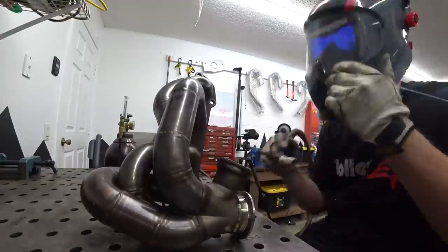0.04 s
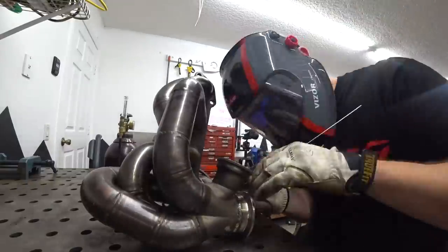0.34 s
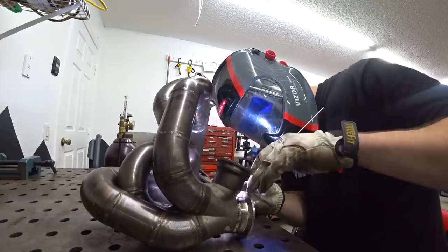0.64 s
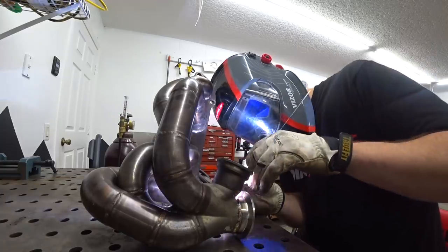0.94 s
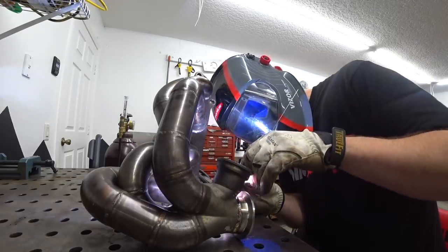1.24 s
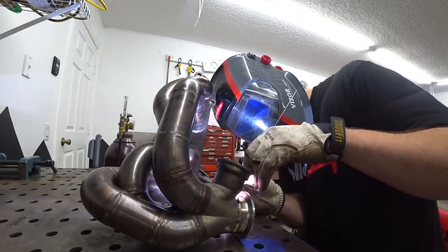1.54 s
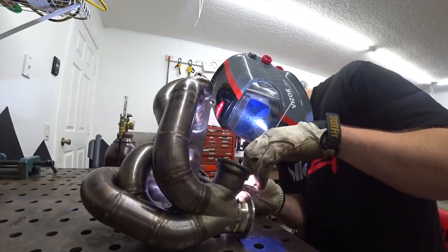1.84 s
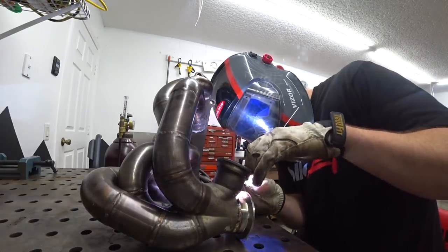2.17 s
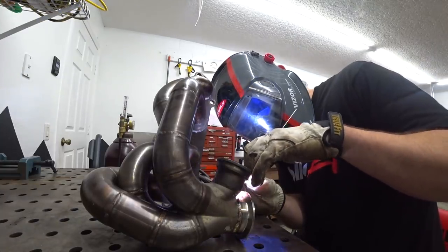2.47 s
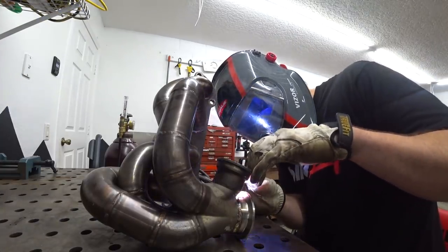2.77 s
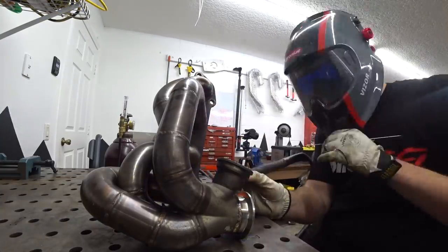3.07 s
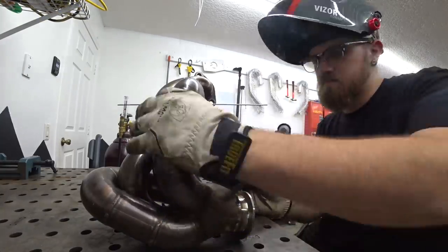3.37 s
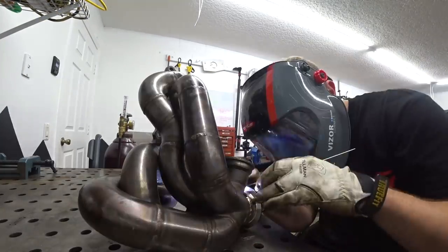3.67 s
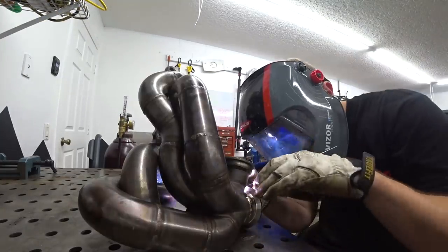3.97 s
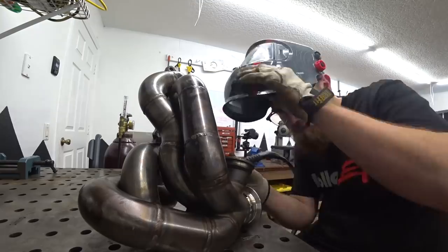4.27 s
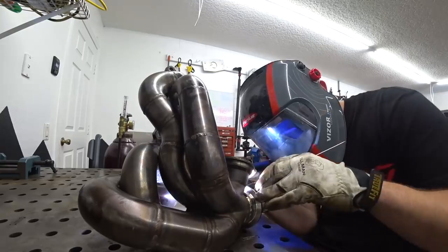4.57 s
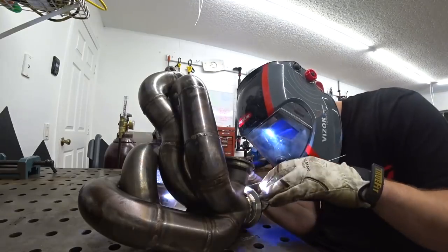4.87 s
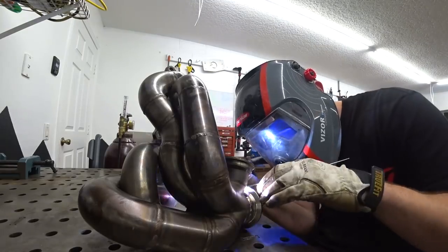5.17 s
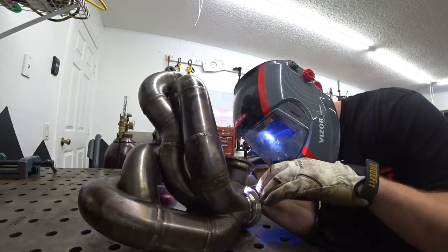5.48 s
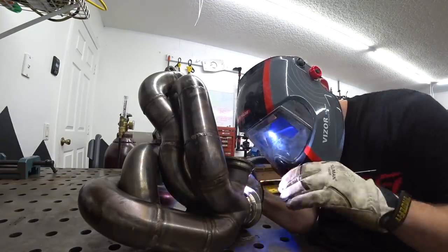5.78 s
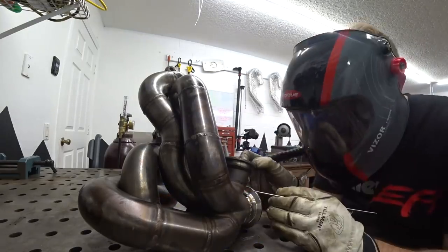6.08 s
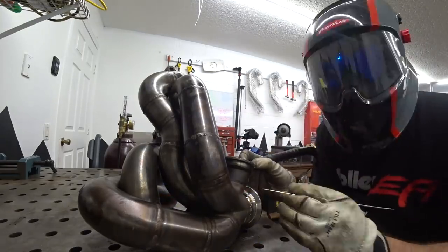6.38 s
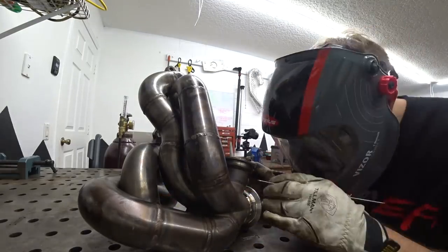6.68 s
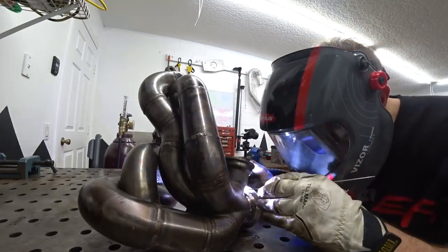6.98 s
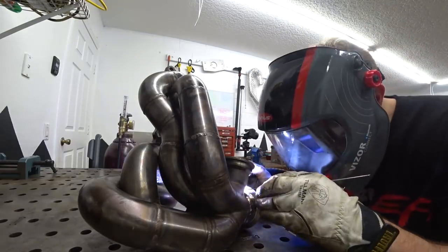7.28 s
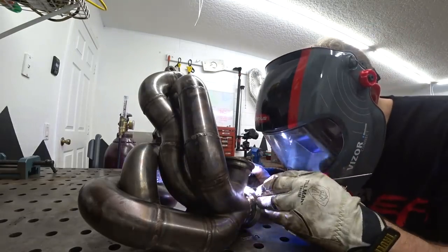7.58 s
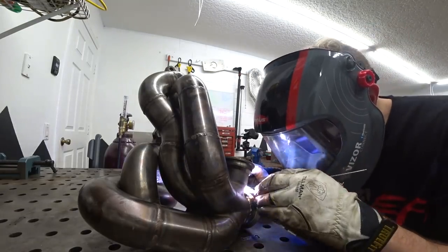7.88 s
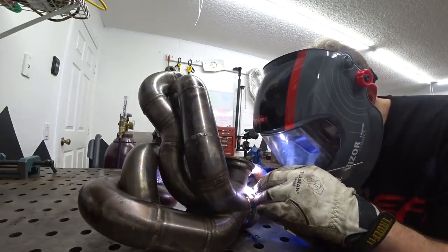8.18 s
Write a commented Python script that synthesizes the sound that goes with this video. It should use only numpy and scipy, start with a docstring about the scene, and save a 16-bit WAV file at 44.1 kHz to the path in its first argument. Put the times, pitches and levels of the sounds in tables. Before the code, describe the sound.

Steady welding hiss and the fan whir and electrical hum of the machine, with scattered clunks and scrapes of steel on a bench.

```python
"""A TIG torch welds a steel pipe manifold: the arc strikes with a crackle of sparks, then arc and gas hiss
steadily, coloured by reflections off the pipe. A thin whistle follows the strike, and the arc flares once.
The welding machine's transformer hums, one cooling fan drives air through its case throughout, and a
faster one whines up to speed. Things knock, scrape and squeak on the workshop bench with a little ring
of steel, and a faint low drone comes and goes behind it all."""
import sys
import numpy as np
from scipy import signal
from scipy.fft import rfft, irfft, next_fast_len
from scipy.io import wavfile
from scipy.ndimage import uniform_filter1d, map_coordinates

SR = 44100
rng = np.random.default_rng(int(sys.argv[2]) if len(sys.argv) > 2 else 0)


def pcm_store(signal):
    """Save signal as 16-bit PCM."""
    levels = np.round(np.clip(np.atleast_2d(signal), -1, 1) * 32767)
    wavfile.write(sys.argv[1], SR, levels.astype(np.int16).T)


N = 362502
TIME = np.arange(N) / SR


def amp(db):
    """Decibels to gain."""
    return 10 ** (np.asarray(db) / 20)


def unit(x):
    """Normalise to rms 1."""
    return x / np.sqrt(np.mean(np.abs(x) ** 2) + 1e-20)


def along(points, hz):
    """Read an EQ curve of (frequency, value) points on a log axis."""
    freqs, values = np.transpose(points)
    return np.interp(np.log(hz + 1), np.log(freqs + 1), values)


def bells(peaks, hz):
    """Boost or cut in dB from resonances given as (centre, width, gain)."""
    return sum(db / (1 + (2 * (hz - centre) / width) ** 2) for centre, width, db in peaks)


def automation(points):
    """A fader ride: straight lines between (time, value) points."""
    return np.interp(TIME, *np.transpose(points))


def swell(age, rise, t60):
    """An envelope that grows to its peak at age 0, then falls 60 dB in t60 seconds."""
    return np.exp(np.minimum(age, 0) / rise) * amp(-60 * np.maximum(age, 0) / t60)


def wobble(rate):
    """Smooth random modulation, rate points a second."""
    return map_coordinates(rng.standard_normal(int(N * rate / SR) + 4), [TIME * rate])


def cycle(hz):
    """Oscillator phase for a moving pitch, from a random start."""
    return 2 * np.pi * (np.cumsum(hz) / SR + rng.random())


def filtered(x, response):
    """EQ x with a gain for each frequency."""
    size = x.shape[-1]
    padded = next_fast_len(size + 8192)
    return irfft(rfft(x, padded) * response(np.fft.rfftfreq(padded, 1 / SR)), padded)[..., :size]


# Stereo width, almost mono in the bass: (frequency [Hz], side against mid [dB])
STEREO_WIDTH = [(60, -28), (150, -26), (300, -24), (600, -20), (1000, -18), (1500, -12), (2600, -7),
                (4000, -8.5), (7000, -10.5), (11000, -14), (15000, -15)]
def noise(colour, size=N):
    """Stereo noise of rms 1; colour gives dB for each frequency."""
    mid_side_eq = lambda hz: amp([colour(hz), colour(hz) + along(STEREO_WIDTH, hz)])
    mid, side = filtered(rng.standard_normal((2, size)), mid_side_eq)
    return unit(np.array([mid + side, mid - side]))


def tone(phase, hz, rough, flutter):
    """A stereo tone of rms 1, fluttering in level and phase; hz sets how far the right side leads."""
    swirl = unit(1 + rough * (wobble(flutter) + 1j * wobble(flutter)))
    lead = np.arctan(amp(along(STEREO_WIDTH, hz))) * np.array([[-1], [1]])
    return np.sqrt(2) * np.real(swirl * np.exp(1j * (phase + lead)))


# Bright bed of arc and gas: (frequency [Hz], spectrum level [dB])
HISS_EQ = [(2000, -18), (4300, -13), (5500, -2.5), (6400, -0.5), (6950, -6), (7700, -1.5), (8600, -2),
           (9100, -3.5), (9400, -3.5), (10300, -.5), (11500, -1), (13000, -4), (14200, -2), (15500, -5)]
# Narrow resonances of the surrounding metal: (centre [Hz], width [Hz], gain [dB])
METAL_PEAKS = [(6430, 99, 3), (9430, 150, 7.5), (10180, 160, 5.5)]
# Places where the torch rests; reflections off the pipe cancel one band and lift another:
# (start [s], level [dB], notch [Hz], notch depth [dB], lifted band [Hz], high shelf [dB])
TORCH_PLACES = [(0, -32.5, 8000, 1.5, 10400, -1.5), (.28, -32.8, 13850, -2, 10350, -5.5),
                (.75, -33.5, 14600, 0, 10900, -5), (1.2, -33.5, 12900, 2, 11600, -1.5),
                (2.35, -33, 10820, 4, 12100, 1.5), (3, -33.5, 12700, 8, 11000, 0.5),
                (5.7, -33, 11980, 10, 10900, .5), (6.7, -33, 11900, 8.5, 11100, 0)]
def arc_hiss(crossfade_s=.25, notch_width_hz=320, lift_width_hz=300, lift_db=1.8, ripple_db=1.9):
    """Arc and gas hiss, coloured by nearby metal as the torch moves from place to place."""
    # many short reflections leave a fine, static ripple in the spectrum
    ripple = lambda hz: ripple_db * map_coordinates(rng.standard_normal(1024), [hz / 30])
    bed = noise(lambda hz: along(HISS_EQ, hz) + bells(METAL_PEAKS, hz) + ripple(hz))
    hz, t, spectrum = signal.stft(bed, SR, nperseg=512)
    starts, level_db, notch_hz, depth_db, lift_hz, shelf_db = np.transpose(TORCH_PLACES)
    resting = np.eye(len(starts))[:, np.searchsorted(starts[1:], t)]
    blend = uniform_filter1d(resting, round(crossfade_s / (t[1] - t[0])), axis=1)
    band = lambda centre, width=notch_width_hz: np.exp(-.5 * ((hz[:, None] - centre) / width) ** 2)
    comb = depth_db * (band(notch_hz) + .3 * band(.76 * notch_hz) + .7 * band(1.24 * notch_hz))
    shelf = shelf_db * along([(11000, 0), (14000, 1)], hz)[:, None]
    colour_db = (shelf - comb + lift_db * band(lift_hz, lift_width_hz)) @ blend
    # small movements of the hands shift the colour slowly
    patches = uniform_filter1d(rng.standard_normal(spectrum.shape[1:]), size=7, axis=0)
    drift_db = .5 * unit(uniform_filter1d(patches, size=70, axis=1))
    hiss = signal.istft(spectrum * amp(colour_db + drift_db), SR, nperseg=512)[1][:, :N]
    return amp(np.interp(TIME, t, level_db @ blend) + .19 * wobble(30)) * unit(hiss)


# Brittle snap of one spark: (frequency [Hz], spectrum level [dB])
SPARK_EQ = [(590, -67), (1000, -30), (1230, -10), (1510, -16), (1620, -2), (2260, -13), (2840, 2),
            (4050, -17), (5150, 0), (9360, -7), (15500, -1)]
def sparks(run_s=.078, gap_s=.006, first_db=-21.5, build_db=3.5, scatter_db=1, t60=.036):
    """The arc strikes with a quick, uneven run of snaps that builds until it settles."""
    out, t = np.zeros((2, N)), np.arange(SR // 8) / SR
    for slot in np.arange(0, run_s, gap_s):
        onset = slot + gap_s * rng.random()
        db = first_db + build_db * onset / run_s + scatter_db * rng.standard_normal()
        snap = noise(lambda hz: along(SPARK_EQ, hz), size=len(t))
        start = round(onset * SR)
        out[:, start:start + len(t)] += amp(db - 60 * t / t60) * snap
    return out


# Rush of the cooling air: (frequency [Hz], spectrum level [dB])
AIR_EQ = [(15, -63), (25, -16.5), (90, -28.5), (129, -10), (268, -17.5), (293, -25), (327, -13.5),
          (695, -10.5), (948, 0), (1060, -7.5), (1890, -5.5), (2200, -6.5), (2810, -9.5), (3350, -10),
          (5000, -13), (6500, -81), (11000, -120)]
# Resonances of the machine's case: (centre [Hz], width [Hz], gain [dB])
CASE_RESONANCES = [(72.5, 17, 16), (151.45, 64, 6.5), (417, 79, -8.5), (832, 95, 1.5), (1427, 200, 5),
                   (1920, 138, 7.5), (2160, 60, -3), (2367, 34, 10), (2846, 140, 7.5), (3870, 160, 4)]
# Airflow, with a brief early dip: (time [s], level [dB])
AIR_RIDE = [(0, -37), (.4, -40), (1, -36.5), (3, -36.5), (5, -37), (8.2, -37)]
def fan_air():
    """Air rushes through the resonant case of the welding machine."""
    gain = amp(automation(AIR_RIDE) + .28 * wobble(7.4))
    return gain * noise(lambda hz: along(AIR_EQ, hz) + bells(CASE_RESONANCES, hz))


# Partials of the seven-blade fan: (shaft order [multiple], level at settled airflow [dB])
SLOW_FAN_PARTIALS = [(6, -64), (7, -53.5), (10, -53), (12, -53), (13, -50.5), (14, -59), (15, -54),
                     (22, -56), (23, -57), (26, -81), (27, -54.5), (28, -54.5), (29, -49.5), (39, -58.5)]
def slow_fan(shaft_hz=132.74):
    """A steady fan sings a long row of weak shaft harmonics that ride with the airflow."""
    shaft = cycle(shaft_hz * (1 + .000488 * wobble(2)))
    flow_db = automation(AIR_RIDE)
    partials = sum(amp(db) * tone(order * shaft, order * shaft_hz, rough=.4, flutter=25)
                   for order, db in SLOW_FAN_PARTIALS)
    return amp(flow_db - flow_db[-1]) * partials


# Mains hum and steady whines: (frequency [Hz], level [dB])
HUM_PARTIALS = [(120, -72), (300, -48), (600, -62.5), (900, -53.5), (1200, -70), (2347, -66), (6395, -61)]
def transformer_hum():
    """The transformer holds clean, steady tones under the fans."""
    return sum(amp(db) * tone(2 * np.pi * hz * TIME, hz, rough=.026, flutter=5)
               for hz, db in HUM_PARTIALS)


# Dull body of the bench: (frequency [Hz], spectrum level [dB])
BENCH_EQ = [(70, -38), (140, -33), (200, -4), (280, -14.5), (480, -4.5), (850, -5.5), (1100, -0.5),
            (1400, -0.5), (1800, -9.5), (2700, -9.5), (3200, -13), (4600, -18), (5600, -22), (15000, -46)]
# Ringing modes of the steel: (frequency [Hz], relative level [dB], decay to -60 dB [s])
STEEL_MODES = [(575, -11, 0.21), (810, -3.5, 0.22), (936, -12, 0.34), (1274, -16, .14), (1510, -29, .14)]
def bench_contact(peak_s, db, rise, t60, tilt_db, ring_db):
    """One contact swells, then dies as a dull clatter with a little ringing steel."""
    out, t = np.zeros((2, N)), np.arange(SR) / SR
    start = max(0, round((peak_s - .1) * SR))  # leave room for the attack
    age = t + start / SR - peak_s
    clatter = noise(lambda hz: along(BENCH_EQ, hz) + tilt_db * np.log2(np.clip(hz, 200, 5000)), len(t))
    ring = np.zeros(len(t))
    for hz, mode_db, mode_t60 in STEEL_MODES:
        gain = amp(mode_db + rng.standard_normal())  # every blow weights the modes a little differently
        ring += gain * swell(age, rise, mode_t60) * np.sin(2 * np.pi * (hz * age + rng.random()))
    out[:, start:start + len(t)] = amp(db) * (clatter * swell(age, rise, t60) + amp(ring_db) * ring)
    return out


# Knocks on the bench: (time [s], level [dB], tilt [dB/octave], ring against clatter [dB])
KNOCK_CUES = [(.095, -32, -1, -8), (1.153, -36, 1, -10), (1.213, -28.5, -2, 1), (2.014, -19, 0, -5.5),
              (2.252, -23, 1, 0.5), (2.279, -30.5, 2, 0), (2.342, -31.5, 0, 3), (2.617, -33, -1, 7),
              (2.745, -38, -4.5, 7), (3.15, -37, 0.5, -8), (3.397, -34, 2, -8), (3.782, -29.5, 1, -14),
              (4.555, -36.5, -1, -6), (4.84, -32, .5, 4)]
def knocks(reference_db=-26.5, reference_rise_s=.0042, t60=.2):
    """Short blows on the bench: the harder the hit, the sharper the attack."""
    return sum(bench_contact(peak_s, db, reference_rise_s * amp(reference_db - db), t60, tilt_db, ring_db)
               for peak_s, db, tilt_db, ring_db in KNOCK_CUES)


def gas_whistle(peak_s=.15, db=-42, settled_hz=1345, sag_hz=64.7, sag_s=.0706):
    """A thin note after the strike that sags to a steady pitch and fades as the gas flow settles."""
    age = TIME - peak_s
    hz = settled_hz + sag_hz * np.exp(-np.maximum(age, 0) / sag_s)
    return amp(db) * swell(age, rise=.015, t60=2.6) * tone(cycle(hz), settled_hz, rough=.28, flutter=98)


# Glove and tool sliding over the bench: (time [s], level [dB], tilt [dB/octave])
SCRAPE_CUES = [(.195, -41.5, -4.5), (.92, -42.5, -3.5), (2.245, -28.5, 4.5), (3.53, -36, -0.5),
               (4, -44, -4.5), (4.479, -33, -1), (4.7, -35, 1.5)]
def scrapes():
    """Sliding contacts have a soft attack, a longer tail and hardly any ring."""
    return sum(bench_contact(peak_s, db, rise=.025, t60=.51, tilt_db=tilt_db, ring_db=-7)
               for peak_s, db, tilt_db in SCRAPE_CUES)


# Partials of the five-blade fan: (shaft order [multiple], relative level [dB])
FAST_FAN_PARTIALS = [(3, -32.5), (4, -27), (5, -1), (7, -29), (8, -13.5), (9, -23.5), (10, -8), (15, -12.5),
                     (20, -20)]
# Standing waves of the room: (centre [Hz], width [Hz], gain [dB])
ROOM_MODES = [(815, 25, -3), (858, 25, 4), (886, 16, -7), (906, 12, 4), (917, 10, -4)]
# Fader on top of the whine's growth with speed, surging near full speed: (time [s], gain [dB])
WHINE_RIDE = [(.35, -31), (.56, -29), (.8, -28.5), (1.1, -35), (1.5, -48), (3.1, -38.5), (8.2, -40.5)]
def fast_fan(idle_hz=69, full_hz=192.3, spin_up_s=.436, whine_power=7):
    """Blade tones rise with the shaft; eddies that lag the blades add a fuzzy band just below."""
    shaft_hz = full_hz - (full_hz - idle_hz) * np.exp(-(TIME / spin_up_s) ** 2)
    shaft = cycle(shaft_hz * (1 + .0005 * wobble(4)))
    speed = shaft_hz / full_hz
    whine = np.zeros((2, N))
    for order, db in FAST_FAN_PARTIALS:
        fade_in = speed ** 7 if order > 8 else 1  # upper partials only arrive near full speed
        room_db = bells(ROOM_MODES, order * shaft_hz)  # a gliding tone surges through the room's modes
        partial = tone(order * shaft, order * full_hz, rough=.025 * order, flutter=30)
        whine += amp(db + room_db) * fade_in * partial
    eddies = tone(cycle(shaft_hz * 4.86), 950, rough=6, flutter=60)
    return amp(automation(WHINE_RIDE)) * speed ** whine_power * whine + amp(-47.5) * speed ** 10 * eddies


# Swells of the drone: (centre time [s], half length [s], pitch [Hz], glide [Hz/s], level [dB])
DRONE_CUES = [(.9, 0.81, 148.5, 1, -56), (4.048, 0.27, 147.8, 1.5, -51), (4.6, 0.17, 161.6, 75.5, -54),
              (7.603, 0.13, 122.5, -5, -54.5), (8.167, 0.18, 125, 30, -52)]
def drone():
    """A faint, uneven low note comes and goes in smooth swells."""
    out = np.zeros((2, N))
    for centre_s, half_s, hz, glide, db in DRONE_CUES:
        age = TIME - centre_s
        envelope = amp(db) * np.exp(-.5 * (age / half_s) ** 2)
        out += envelope * tone(cycle(hz + glide * age), hz, rough=.47, flutter=20)
    return out


def squeak(peak_s=2.222, db=-39.5, top_hz=4780, fall_hz_per_s=6000):
    """A rough note that falls as the sliding slows, leading into the loudest scrape."""
    age = TIME - peak_s
    hz = np.clip(top_hz - fall_hz_per_s * age, top_hz / 2, top_hz)
    return amp(db) * swell(age, rise=.012, t60=.4) * tone(cycle(hz), top_hz, rough=2, flutter=350)


def arc_flare(peak_s=5.68, db=-35, centre_hz=9200, half_width_hz=2200):
    """The arc surges once in a short, brighter wash of hiss."""
    envelope = amp(db) * swell(TIME - peak_s, rise=.027, t60=1.3)
    return envelope * noise(lambda hz: -10 * np.log10(1 + ((hz - centre_hz) / half_width_hz) ** 4))


def scene():
    """Mix torch, machine and bench over the drone."""
    torch = arc_hiss() + sparks() + gas_whistle() + arc_flare()
    machine = fan_air() + slow_fan() + transformer_hum() + fast_fan()
    bench = knocks() + scrapes() + squeak()
    return torch + machine + bench + drone()


def record(dry):
    """A brick-wall low-pass trims the very top of the mix."""
    return filtered(dry, lambda hz: hz < 15750)


dry = scene()
out = record(dry)
pcm_store(out)
```